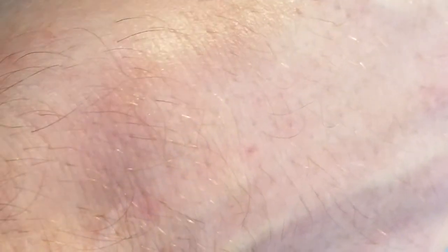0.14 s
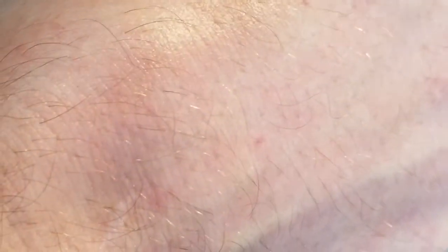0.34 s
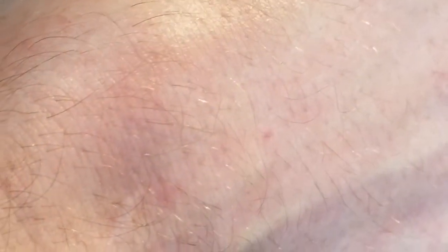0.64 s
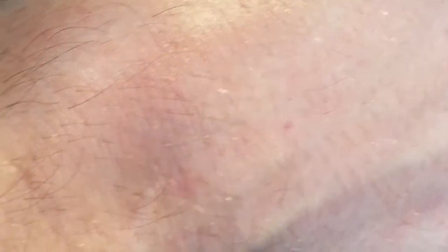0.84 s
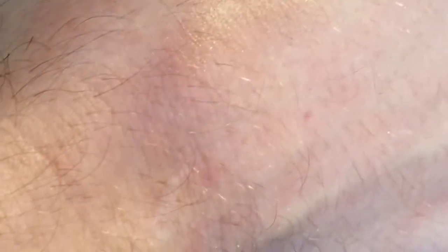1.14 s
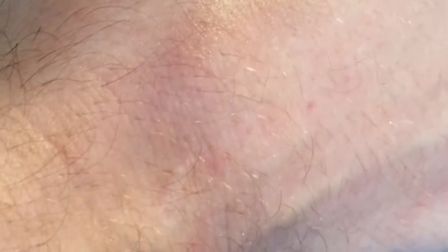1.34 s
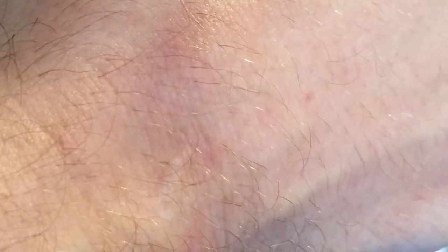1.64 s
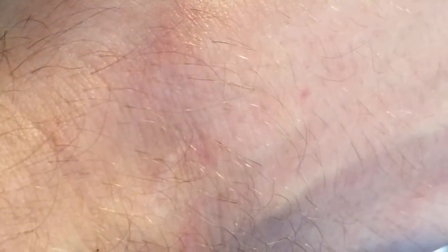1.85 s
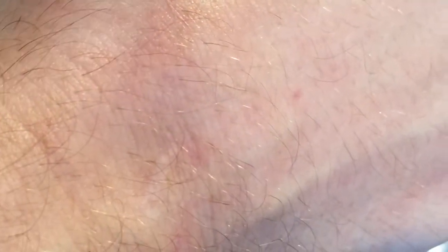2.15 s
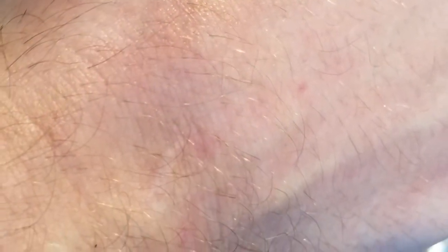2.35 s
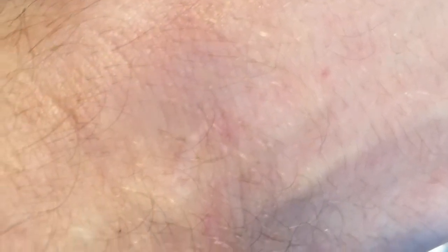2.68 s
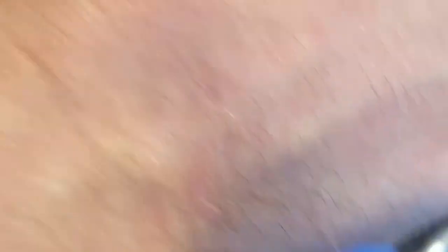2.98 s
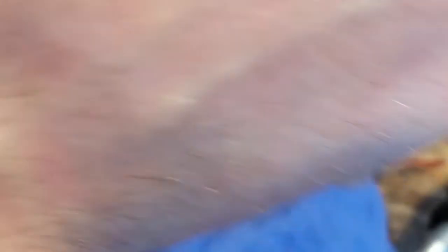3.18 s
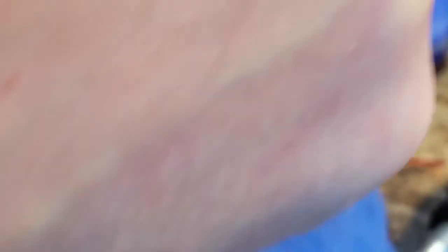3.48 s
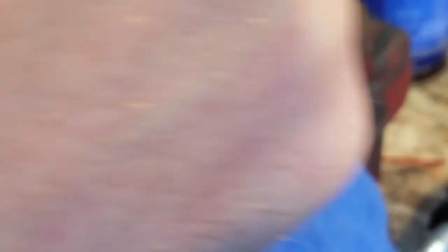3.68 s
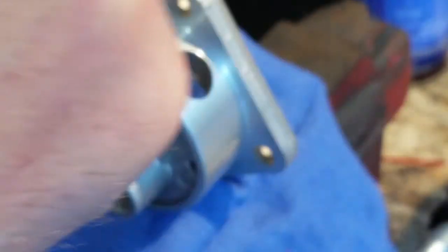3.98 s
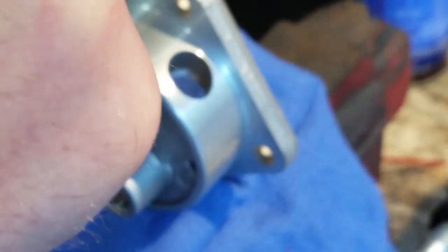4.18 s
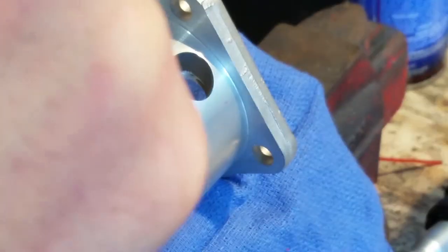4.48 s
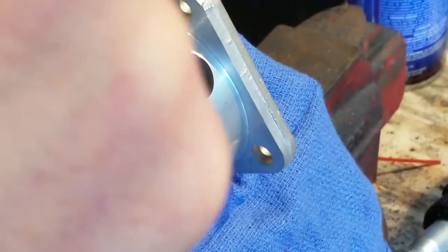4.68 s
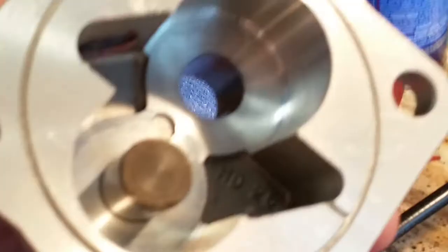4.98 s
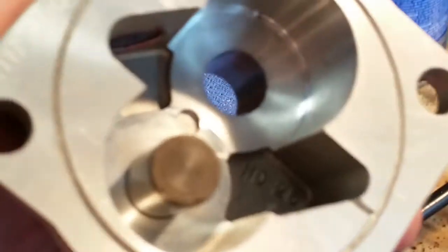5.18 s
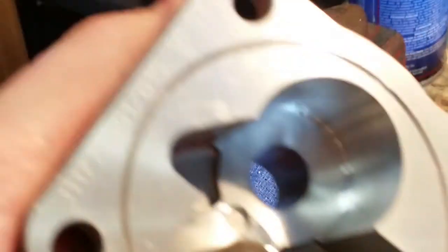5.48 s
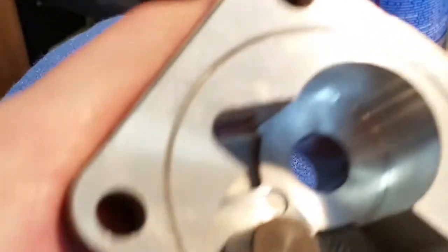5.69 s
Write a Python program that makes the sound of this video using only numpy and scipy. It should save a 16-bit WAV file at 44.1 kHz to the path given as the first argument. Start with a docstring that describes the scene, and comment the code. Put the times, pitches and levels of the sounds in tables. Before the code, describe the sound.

A handheld rotary tool drones and rasps on metal in short passes, then cuts abruptly to a quiet humming workshop with soft handling knocks.

```python
"""Rotary tool grinding metal, then a quiet workshop

A handheld rotary tool runs at about 310 turns a second close to the microphones, grinding a metal housing.
Shaft and bearing tones mix with shaped noise for air, brushes, a rattling shank and the chattering bit.
The bit works in short passes; the hand shifts and the drone thins, then the sound cuts abruptly
to the quiet, humming workshop, where a hand slides over the part and picks it up.
Filtered noise makes the rubbing and bumps; fading sine waves make the knocks and a small clink."""
import sys
import numpy as np
from scipy import signal
from scipy.fft import rfft, irfft, next_fast_len
from scipy.io import wavfile
from scipy.ndimage import map_coordinates

SR = 44100
rng = np.random.default_rng(int(sys.argv[2]) if len(sys.argv) > 2 else 0)


def transcribe(u):
    """Save the signal u as a 16-bit wav file named by the first command-line argument.

    u: samples, shape (n,) or (channels, n), limited to [-1, 1]; the rate is SR.
    q: integer samples, one column per channel.
    """
    v = np.clip(np.atleast_2d(u).T, -1, 1)
    q = np.round(v * 32767).astype(np.int16)
    wavfile.write(sys.argv[1], SR, q)


N = 257103
T = np.arange(N) / SR  # time of each sample in seconds
CUT_S = 4.433  # abrupt cut from the running tool to the quiet workshop
PULSE_HZ = 120  # power pulses of the mains
TOP_HZ = 15800  # upper limit of the sound

# In the noise spectra, levels hold for a gate of 1; most gates change them over time.
# workshop background: (frequency [Hz], left [dB per Hz], right [dB per Hz])
ROOM = [(25, -80, -86.5), (70, -71, -68), (130, -77.5, -74), (400, -76, -80), (557, -86, -88),
        (1004, -91, -96), (1810, -104, -108), (2580, -103, -110), (3550, -92, -109), (4000, -81, -107),
        (5000, -87, -111), (6000, -124, -129), (8500, -133, -133), (15000, -116, -114)]
# skin and cloth sliding on the part: (frequency [Hz], left [dB per Hz], right [dB per Hz])
SKIN = [(60, -92.5, -85.5), (250, -71.5, -73), (600, -87, -90), (1300, -88.5, -93), (3000, -90, -97),
        (4400, -86, -101), (6500, -90.5, -106), (9500, -102, -109), (12500, -96, -91), (15780, -99, -91)]
# slides of the hand over the part: (start [s], end [s], gate level [dB])
SLIDES = [(4.947, 5.203, -3.5), (5.257, 5.31, 4), (5.36, 5.425, 10), (5.531, 5.571, -7.5)]
SLIDE_RISE_S, SLIDE_FALL_S = 0.023, .045
# the palm rubs lightly all the while it holds the part: (start [s], end [s], gate level [dB])
HOLD = (4.89, 5.78, -11)
# light ticks of the part in the hand: (time [s], gate level [dB])
TICKS = [(5.233, -36.5), (5.3457, -36), (5.5069, -33.5), (5.5423, -41)]
# colour of the ticks: (frequency [Hz], left [dB per Hz], right [dB per Hz])
TICK_COLOUR = [(1500, -57, -66), (5500, -38, -54), (9000, -56, -62), (13000, -47, -41), (15700, -52, -46.5)]
# colour of one scuff: (frequency [Hz], left [dB per Hz], right [dB per Hz])
SCUFF_COLOUR = [(2500, -92, -95.5), (4270, -65, -80), (6000, -79, -92), (9500, -92, -100),
                (14000, -88, -74), (15800, -91, -82.5)]
# soft bumps of the part against the hand: (time [s], tap gate level [dB], thud gate level [dB])
BUMPS = [(4.47, -6, -6), (5.064, -12.5, 2), (5.092, -7, -0.5), (5.386, -5, -4), (5.625, -1.5, -11.5)]
# colour of the dull tap: (frequency [Hz], left [dB per Hz], right [dB per Hz])
TAP_COLOUR = [(200, -62.5, -60), (500, -75, -64), (1000, -72, -73), (2000, -86, -87.5)]
# colour of the low thud: (frequency [Hz], left [dB per Hz], right [dB per Hz])
THUD_COLOUR = [(50, -70, -69), (129.0, -60, -49.0), (220, -67, -63), (400, -79, -81)]
# steel touching steel; tilt is how far the point of contact favours the upper modes:
# (time [s], relative level [dB], tilt [dB per octave])
CLINKS = [(5.596, -46, -80), (5.690, -30, 60), (5.704, -30, -55)]
# the steel's modes: (frequency [Hz], relative level [dB], time to fade by 60 dB [s])
STEEL = [(12400, -3.5, 0.15), (12900, -13, .04), (13810, 0, 0.15)]
# the part knocks and catches as it is lifted: (time [s], relative level [dB])
KNOCKS = [(5.384, -33), (5.388, -27.5), (5.414, -28.5), (5.4196, -20), (5.4245, -24)]
# what the knocks ring with, damped by the hand: (frequency [Hz], relative level [dB], time to fade by 60 dB [s])
HOUSING = [(1270, -25, 0.0055), (1910, -12, 0.0054), (2390, -6, 0.012), (2830, -7, 0.011)]
# the room's answer to the knocks: (frequency [Hz], left [dB per Hz], right [dB per Hz])
KNOCK_ECHO = [(400, -81, -81.5), (1200, -76, -75), (2000, -63, -67), (2500, -53, -61.5),
              (3500, -68, -82), (8000, -80, -96), (15000, -88, -82)]

# the shaft's average speed: (time [s], speed [turns per s])
SHAFT = [(0.06, 303.4), (0.19, 303.4), (0.66, 309.0), (0.9, 308.9), (1.08, 307.1), (1.59, 307.6),
         (1.8, 304.8), (2.37, 304.7), (3.15, 313.2), (3.44, 311.6), (4.07, 313.2), (4.38, 311.4)]
# the hand's position: (time [s], grip [0 = first grip, 1 = second grip])
GRIP = [(2.55, 0.0039), (3.2, 1)]
# puffs of vent air on a microphone port:
# (time [s], level [dB], rise [s], final pitch [Hz], left minus right [dB])
PUFFS = [(3.15, -36, .014, 42, 14), (3.205, -27.5, 0.0099, 62, 24), (4.286, -12, 0.0041, 71.4, -22)]
PUFF_SAG, PUFF_SAG_S = 2.3, 0.0043  # extra pitch at the start over the final pitch, and how fast it sags
# cooling air through the vents: (frequency [Hz], left [dB per Hz], right [dB per Hz])
AIR = [(25, -83, -86), (55, -68, -69.5), (80, -73.5, -74), (125, -69, -67.5), (175, -72.5, -70.5),
       (350, -59.5, -64), (560, -64.5, -59.5), (780, -59, -63.5), (1126, -68.5, -67.5), (1690, -65.5, -66),
       (3020, -64, -66.5), (3970, -65.5, -80), (4950, -64.5, -84), (7040, -71, -86.5), (9500, -71, -87),
       (15700, -77, -77.5)]
# buzz of the case: (frequency [Hz], left [dB per Hz], right [dB per Hz])
CASE_BUZZ = [(200, -91, -82.5), (327, -57.5, -62), (600, -60.0, -62), (803, -55.0, -76), (1090, -99, -96)]
# carbon brushes on the commutator: (frequency [Hz], left [dB per Hz], right [dB per Hz])
BRUSHES = [(3000, -100, -110), (6400, -73.5, -91), (8060, -69.5, -87), (9620, -81, -77),
           (11300, -75.5, -68), (13000, -83, -65), (13940, -74, -65), (14900, -73, -56.5),
           (15670, -72, -57)]
# the bearing's whine: (time [s], relative level [dB])
WHINE = [(0.0, -35), (0.28, -38.5), (0.45, -44), (0.51, -36), (0.87, -35), (1.1, -46), (1.61, -36.5),
         (1.66, -54), (1.71, -39.5), (2.55, -41), (2.68, -27), (2.81, -34), (3.03, -32.5), (3.12, -35.5),
         (4.18, -33.5), (4.31, -40.5), (4.41, -33.5)]
# fuzzy bearing and commutator tones:
# (pitch [shaft multiple], first grip [dB], second grip [dB], left minus right [dB])
BEARING = [(3.02, -55, -37, 8), (4.77, -48, -41.5, 14), (4.75, -53, -67, -6.5), (5, -48.5, -45, 4.5),
           (5.67, -56, -55, -8), (6.03, -44, -42, 27), (6.46, -51, -45.5, 13), (7.054, -41.5, -39.5, 31),
           (14.15, -48.5, -46, 13), (16.1, -44.5, -60.5, 17), (17.9, -48.5, -47, 19), (48, -44, -42, -15),
           (49, -42, -44, -15)]
# how hard the case shakes, once a turn: (time [s], relative level [dB])
SHAKE = [(0.0, -19), (0.11, -18), (0.88, -25.5), (1.07, -20), (1.5, -22.5), (1.85, -19.5), (2.68, -21),
         (3.19, -31), (3.48, -29), (4.27, -32), (4.41, -26)]
# the second harmonic: its level at the usual shake, the share of the shake's swings that it follows,
# its change in the second grip
USUAL_SHAKE_DB, SECOND_DB, SECOND_FOLLOWS, SECOND_GRIP_DB = -20, -22.5, 0.47, -8.5
# the side tone one pulse rate above the shaft: level, slow waver, swell while the hand shifts
SIDE_TONE_DB, SIDE_WAVER_DB, SIDE_SHIFT_DB = -37, 1.8, 5.5
# motor tones, shaft harmonics split by the mains' power pulses:
# (shaft part [multiple], pulse part [multiple], first grip [dB], second grip [dB], left minus right [dB])
MOTOR = [(1, -1, -55.5, -52, 7), (0, 2, -41, -38.5, 0.5), (2, -1, -60.5, -66, -1), (1, 2, -38.5, -48, 1),
         (0, 5, -44, -45.5, 7), (0, 6, -55, -38.5, -6), (2, 1, -36, -54, 28), (3, -1, -41, -40, -1),
         (2, 2, -79, -45.5, 10.5), (3, 0, -38, -43.5, 33.5), (1, 6, -70, -47.5, 15), (3, 1, -45.5, -43, 26),
         (4, 0, -51, -50, 23), (5, 0, -49.5, -64, -8), (6, 0, -48.5, -43, 18), (7, 0, -58, -63, 25.5),
         (8, 0, -39, -63, 29), (10, 0, -48, -57.5, 9)]
# the shank's low way of ringing: (frequency [Hz], left [dB per Hz], right [dB per Hz])
LOW_RATTLE = [(1236, -90, -93), (1440, -58.5, -61.5), (1590, -73.5, -73.5), (1758, -56, -57),
              (2020, -92, -89)]
# the shank's high way of ringing: (frequency [Hz], left [dB per Hz], right [dB per Hz])
HIGH_RATTLE = [(2420, -79, -84.5), (2760, -56, -60.5), (3320, -75.5, -81), (6800, -85, -100),
               (7900, -64.5, -80), (9700, -76, -83), (12100, -75, -74), (13160, -74, -61.5),
               (14500, -90, -81)]
# spells in which the loose shank rides up and rattles high: (start [s], end [s], relative level [dB])
RIDES = [(-.03, .27, -9.5), (.85, 1.03, 1.5), (1.22, 1.36, -2), (1.53, 1.67, -3.5), (1.70, 1.83, 0),
         (2.09, 2.38, 1), (2.73, 2.822, -5), (3.22, 3.515, 3.5), (3.74, 3.90, 3), (4.16, 4.5, 3.5)]
# time to ride up or down; resting levels; the low rattle gives way
RIDE_EDGE_S, HIGH_REST_DB, LOW_REST_DB, LOW_DUCK_DB = 0.025, -26.5, -4.5, -8
# the shank drops back, rattles low and settles: (time [s], relative level [dB])
DROPS = [(0, -6), (1.83, -6), (2.38, -12.5), (2.82, 4), (3.52, -3), (3.91, -12)]
SETTLE_T60_S = 2.9  # time to fade by 60 dB
# lower resonance of the biting bit: (frequency [Hz], left [dB per Hz], right [dB per Hz])
BITE_LOW = [(1520, -81.5, -97), (2920, -65, -81), (3770, -68.5, -87), (4450, -61, -82),
            (5800, -57.5, -80.5), (6340, -66, -83), (9050, -84, -95)]
# upper resonance of the biting bit: (frequency [Hz], left [dB per Hz], right [dB per Hz])
BITE_HIGH = [(3970, -66, -93), (5920, -70, -83), (6800, -56.5, -82), (7330, -59.5, -78), (8560, -65.5, -81),
             (11000, -81.5, -95.5)]
# passes of the bit over the metal:
# (start [s], end [s], relative chatter level [dB], share of the upper resonance [0-1])
PASSES = [(-.03, .16, -2.5, 0.35), (0.163, .28, -0.5, 0.54), (0.924, 1.03, 0, 0.35),
          (1.032, 1.127, 0.5, 0.2), (1.134, 1.353, -.5, 0.24), (1.367, 1.5, -8, 0.2), (1.5, 1.65, 0, 0.4),
          (1.666, 1.77, 1, 0.28), (1.77, 1.973, -2, 0.38), (1.967, 2.16, -0.1, 0.58)]
BITE_IN_S, LIFT_OFF_S = 0.018, 0.02


def amp(db):
    """Turn decibels into gain."""
    return 10 ** (np.asarray(db) / 20)


def unit(x):
    """Scale to an average strength (rms) of 1."""
    return x / np.sqrt(np.mean(x ** 2) + 1e-20)


def curves(rows):
    """Draw straight lines between rows: one value per sample for each column after the time."""
    s, *cols = np.transpose(rows)
    return [np.interp(T, s, c) for c in cols]


def wobble(rate):
    """A smooth random curve of rms 1 with rate random points a second."""
    points = rng.standard_normal(int(N * rate / SR) + 4)
    return unit(map_coordinates(points, [T * rate]))


def pan(side_db):
    """Left and right gains whose average power is 1."""
    return unit(amp([[side_db / 2], [-side_db / 2]]))


def spell(start, end, rise, fall):
    """A smooth gate that rises around start, holds, and falls around end."""
    opening = 1 + np.tanh((T - start) / rise)
    closing = 1 + np.tanh((end - T) / fall)
    return opening * closing / 4


def strikes(rows, t60):
    """A gate with a sharp rise and a fade of 60 dB in t60 seconds for each (time, level)."""
    return sum(amp(db - 60 * np.abs(T - s) / t60) * (T >= s) for s, db in rows)


def filtered(x, response):
    """Give each frequency of x the gain that response sets."""
    m = next_fast_len(N + SR // 2)
    return irfft(rfft(x, m) * response(np.fft.rfftfreq(m, 1 / SR)), m)[..., :N]


def noise(spectra, gate=1, cycles=None, repeat=0, mono_hz=750):
    """Gated stereo noise with a spectrum for each side; a share of it can repeat with every cycle."""
    f, *sides = np.transpose(spectra)
    white = rng.standard_normal((3, N))
    if cycles is not None:
        # the same rough surface comes round again and again, changing a little each time
        size = round(N / cycles[-1])
        laps = rng.standard_normal((3, int(cycles[-1]) + 2, size))
        worn = signal.lfilter([1], [1, -.88], laps, axis=1)
        surface = np.array([map_coordinates(unit(w.ravel()), [cycles * size]) for w in worn])
        share = np.clip(repeat, 0, 1)
        white = np.sqrt(1 - share) * white + np.sqrt(share) * surface

    def shared(hz):
        """Both sides hear the same bass, so the shared part shrinks as pitch rises."""
        return 1 / np.sqrt(1 + (hz / mono_hz) ** 2)

    def colour(hz):
        """Gain of each side, from straight lines in dB over log frequency."""
        return amp([np.interp(np.log(hz + 1), np.log(f), s, left=-140, right=-140) for s in sides])

    common = filtered(gate * white[0], shared)
    apart = filtered(gate * white[1:], lambda hz: np.sqrt(1 - shared(hz) ** 2))
    return filtered(common + apart, colour) * np.sqrt(SR / 2)


def tone(cycles, blur, flutter_db, rate):
    """A tone of rms 1 whose phase (by blur radians) and level waver."""
    wave = np.cos(2 * np.pi * cycles + blur * wobble(rate))
    return unit(wave * amp(flutter_db * wobble(rate)))


def bursts(cycles, decay, scatter_db):
    """One burst of random size per cycle, dying in a share of the cycle; rms 1."""
    sizes = amp(scatter_db * rng.standard_normal(int(cycles[-1]) + 1))
    return unit(sizes[cycles.astype(int)] * np.exp(-(cycles % 1) / decay))


def workshop():
    """A machine hums in the quiet room, over a faint hiss; all fades in over 5 ms just before the cut."""
    hum_hz = 86.6
    hum = pan(-2.2) * amp(-45.0) * tone(hum_hz * T, blur=.2, flutter_db=0.4, rate=14)
    overtone = amp(-54.5) * tone(2 * hum_hz * T, blur=0.32, flutter_db=2.2, rate=15)
    fade_in = np.clip((T - CUT_S) / .005 + 1, 0, 1)
    return (hum + overtone + noise(ROOM)) * fade_in


def handling():
    """Rubbing skin makes rough noise as a hand slides over the part, which ticks and scuffs."""
    strokes = [*SLIDES, HOLD]
    stroke = sum(amp(db) * spell(start, end, SLIDE_RISE_S, SLIDE_FALL_S) for start, end, db in strokes)
    slide = noise(SKIN, stroke * unit(amp(1.5 * wobble(600))))
    ticks = noise(TICK_COLOUR, strikes(TICKS, t60=0.017))
    scuff = noise(SCUFF_COLOUR, strikes([(5.282, 0)], t60=0.13))
    return slide + ticks + scuff


def bumps():
    """Soft contacts: a short dull tap and a longer low thud."""
    s, tap_db, thud_db = np.transpose(BUMPS)
    tap = noise(TAP_COLOUR, strikes(zip(s, tap_db), t60=0.033))
    thud = noise(THUD_COLOUR, strikes(zip(s, thud_db), t60=0.099))
    return tap + thud


def clinks():
    """Each light contact rings the steel's high modes in its own proportions."""
    out = np.zeros(N)
    middle_hz = np.mean([hz for hz, _, _ in STEEL])
    for s, db, tilt_db in CLINKS:
        age = np.maximum(T - s, 0)
        for hz, mode_db, t60 in STEEL:
            ring_db = mode_db + tilt_db * np.log2(hz / middle_hz) - 60 * age / t60
            ring = amp(ring_db) * np.sin(2 * np.pi * hz * age)
            out += amp(db - 9.5) * ring * amp(1.6 * wobble(300))
    return pan(-8) * out


def knocks():
    """Short dry knocks ring the housing's modes, with a faint answer from the room."""
    dry = np.zeros(N)
    for s, db in KNOCKS:
        age = np.maximum(T - s, 0)
        for hz, mode_db, t60 in HOUSING:
            ring_db = db + mode_db + rng.normal(0, 1.7) - 60 * age / t60
            dry += amp(ring_db) * np.sin(2 * np.pi * hz * age)
    echo = noise(KNOCK_ECHO, strikes(KNOCKS, t60=0.42))
    return pan(6.7) * dry + echo


def puffs():
    """Vent air pushes on a port: a low thud of a few swings that sags in pitch."""
    out = 0
    for s, db, rise, hz, side_db in PUFFS:
        age = np.maximum(T - s, 0)
        cycles = hz * (age + PUFF_SAG * PUFF_SAG_S * (1 - np.exp(-age / PUFF_SAG_S)))
        swell = age / rise * np.exp(1 - age / rise)
        out = out + pan(side_db) * amp(db) * swell * np.sin(2 * np.pi * cycles)
    return out


def vents(turns, grip):
    """Fan air flutters with each turn; the case buzzes more in the first grip."""
    flutter = unit(1 + 0.086 * np.cos(2 * np.pi * turns))
    air = noise(AIR, amp(-1.0) * flutter * amp(0.72 * wobble(14)), turns, repeat=0.21)
    buzz = noise(CASE_BUZZ) * amp(-13 * grip)
    return air + buzz


def brushes(turns):
    """The brushes spark and scrape hardest at one spot of each turn."""
    sparks = bursts(turns, decay=0.93, scatter_db=3.0)
    return noise(BRUSHES, unit(1.8 + sparks) * amp(.4 * wobble(5.2)), turns, repeat=0.28)


def bearings(turns, grip):
    """The balls slip, so their tones are fuzzy and mostly lie between the shaft harmonics."""
    whine_db, = curves(WHINE)
    whine_order = 7.61 + .035 * grip  # whine cycles per turn
    cycles = np.cumsum(whine_order * np.gradient(turns))
    out = pan(-.8) * amp(whine_db + .5) * tone(cycles, blur=0.18, flutter_db=1.1, rate=66)
    for order, early_db, late_db, side_db in BEARING:
        # each side wavers on its own
        fuzzy = np.array([tone(order * turns, blur=0.96, flutter_db=3.0, rate=75) for side in range(2)])
        level_db = early_db + grip * (late_db - early_db)
        out = out + pan(side_db) * amp(level_db) * fuzzy
    return out


def motor(turns, grip):
    """Unbalance shakes the case once a turn; the pulsing mains current adds side tones."""
    shake_db, = curves(SHAKE)
    second_db = SECOND_DB + SECOND_FOLLOWS * (shake_db - USUAL_SHAKE_DB)
    second_db = second_db + SECOND_GRIP_DB * grip + 0.45 * wobble(8.95)
    side_tone_db = SIDE_TONE_DB + SIDE_WAVER_DB * wobble(12) + SIDE_SHIFT_DB * np.sin(np.pi * grip)
    # in the first grip the sound reaches the right port a little earlier
    arrival = turns + np.array([[-1], [1]]) * 0.022 * (1 - 0.8 * grip)
    shake = pan(.5) * amp(shake_db - 0.03) * tone(arrival, blur=0.039, flutter_db=0.2, rate=65)
    second = pan(11.5) * amp(second_db) * tone(2 * turns, blur=0.061, flutter_db=0.2, rate=63)
    side_cycles = turns + PULSE_HZ * T
    side_tone = pan(4.5) * amp(side_tone_db) * tone(side_cycles, blur=0.18, flutter_db=1.8, rate=45)
    out = shake + second + side_tone
    for order, pulses, early_db, late_db, side_db in MOTOR:
        cycles = round(order) * turns + round(pulses) * PULSE_HZ * T
        level_db = early_db + grip * (late_db - early_db)
        out = out + pan(side_db) * amp(level_db) * tone(cycles, blur=0.34, flutter_db=2.13, rate=40)
    return out


def collet(turns):
    """The shank rattles once a turn: high while it rides up, low when it sits in the collet."""
    up = sum(amp(db) * spell(start, end, RIDE_EDGE_S, RIDE_EDGE_S) for start, end, db in RIDES)
    seated = (amp(LOW_REST_DB) + strikes(DROPS, t60=SETTLE_T60_S)) * amp(LOW_DUCK_DB * up ** 2)
    raised = amp(-3) * (amp(HIGH_REST_DB) + up)
    rattle = unit(4 + bursts(turns, decay=0.44, scatter_db=1.5))
    low = noise(LOW_RATTLE, rattle * seated, turns, repeat=0.33)
    high = noise(HIGH_RATTLE, rattle * raised, turns, repeat=0.26)
    return low + high


def grinding(turns):
    """The bit bounces and bites the metal on every second turn; its angle picks the resonance."""
    low = high = 0
    for start, end, db, upper in PASSES:
        press = amp(db) * spell(start, end, BITE_IN_S, LIFT_OFF_S)
        share = np.clip(upper, 0, 1)
        low = low + press * np.sqrt(1 - share)
        high = high + press * np.sqrt(share)
    # the bit lands as the case swings back, half a turn after its push
    bounces = (turns + .5) / 2
    bites = unit(0.2 + bursts(bounces, decay=0.23, scatter_db=1.6))
    bites = amp(1.3) * bites * amp(1.1 * wobble(21.95))
    low_bites = noise(BITE_LOW, bites * low, bounces, repeat=0.47)
    high_bites = noise(BITE_HIGH, bites * high, bounces, repeat=0.42)
    return low_bites + high_bites


def tool():
    """Tones and noises that turn with the shaft, plus the puffs, up to the abrupt cut to the quiet workshop."""
    speed, = curves(SHAFT)
    grip, = curves(GRIP)
    # adding up the slightly unsteady speed counts the turns
    turns = np.cumsum(speed * (1 + 0.00051 * wobble(24.97))) / SR
    tones = motor(turns, grip) + bearings(turns, grip)
    rasp = vents(turns, grip) + collet(turns) + brushes(turns) + grinding(turns)
    heard = np.clip(np.minimum(T, CUT_S + .001 - T) / .002, 0, 1)  # 2 ms fade at each end
    return (tones + rasp + puffs()) * heard


def scene():
    """The tool at work, then the quiet workshop and the hand on the part."""
    return workshop() + handling() + bumps() + clinks() + knocks() + tool()


def record(dry):
    """Cut off the treble very steeply above the upper limit."""
    return filtered(dry, lambda hz: 1 / (1 + (hz / TOP_HZ) ** 300))


dry = scene()
out = record(dry)
transcribe(out)
```